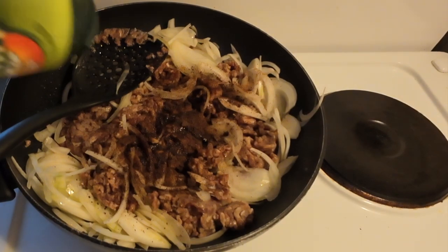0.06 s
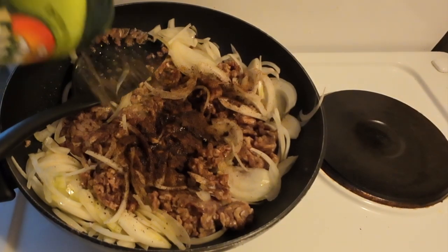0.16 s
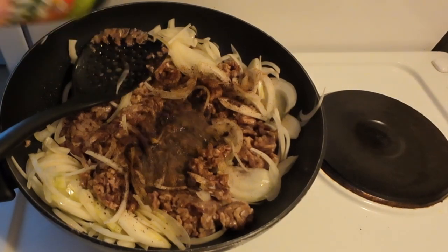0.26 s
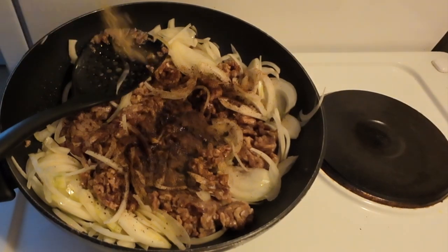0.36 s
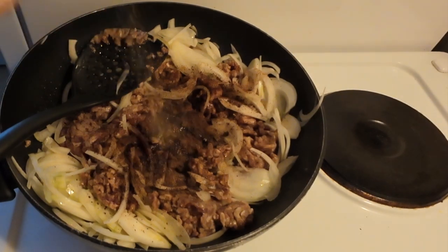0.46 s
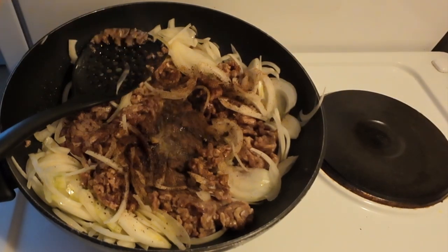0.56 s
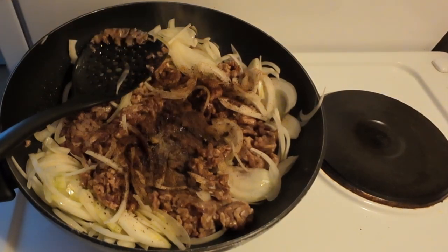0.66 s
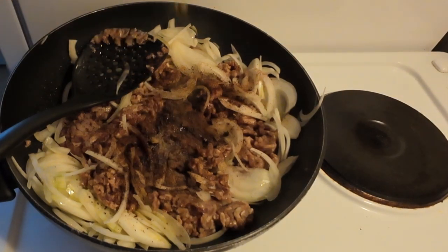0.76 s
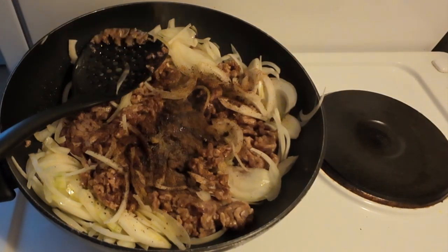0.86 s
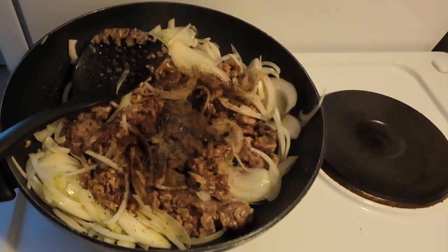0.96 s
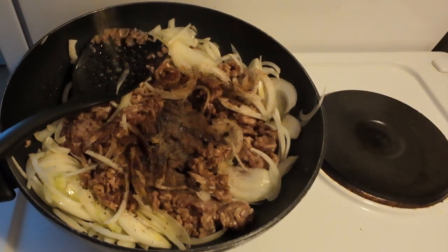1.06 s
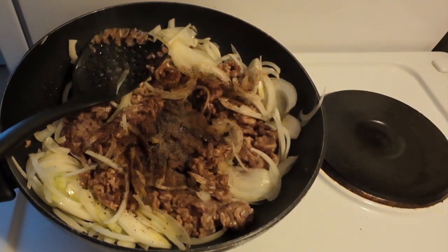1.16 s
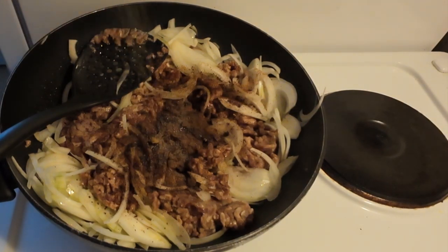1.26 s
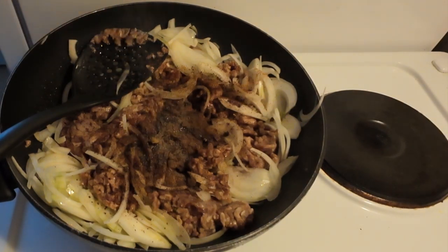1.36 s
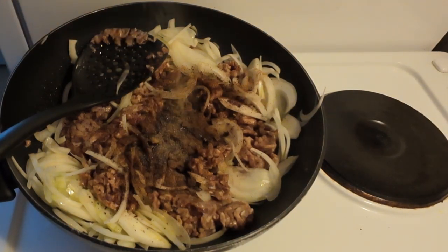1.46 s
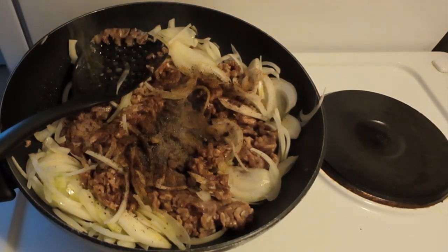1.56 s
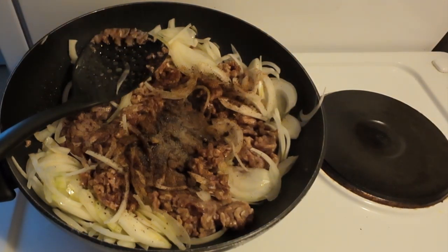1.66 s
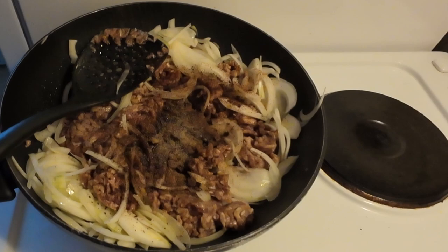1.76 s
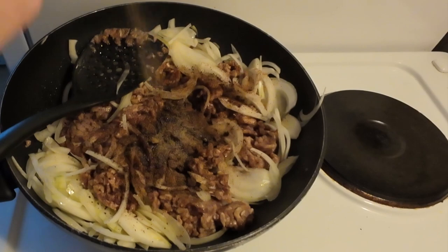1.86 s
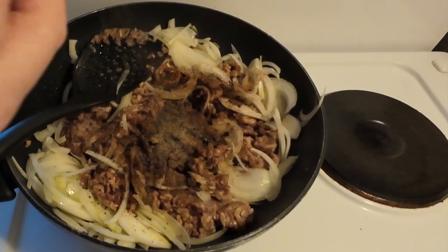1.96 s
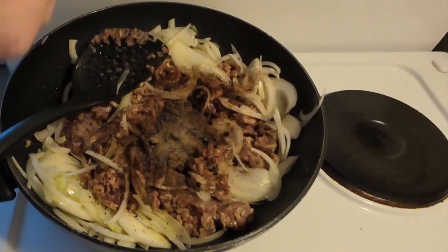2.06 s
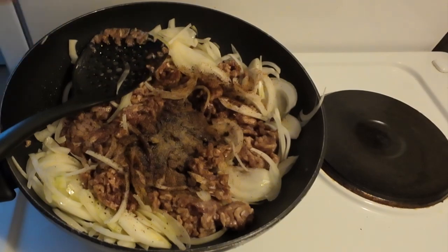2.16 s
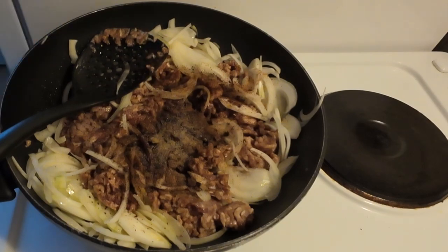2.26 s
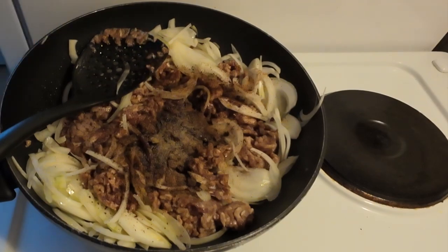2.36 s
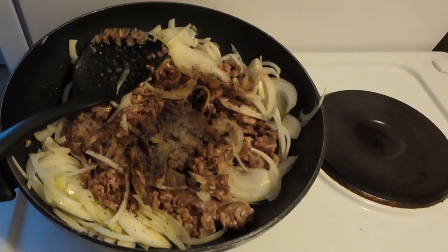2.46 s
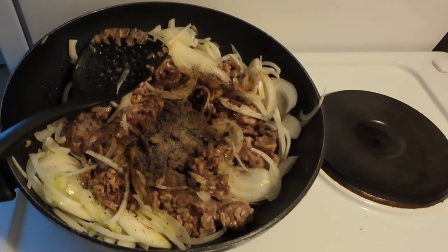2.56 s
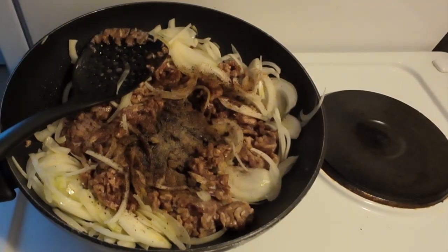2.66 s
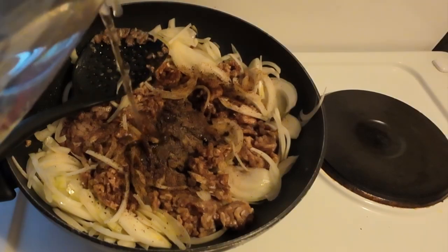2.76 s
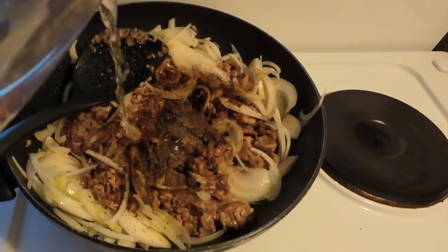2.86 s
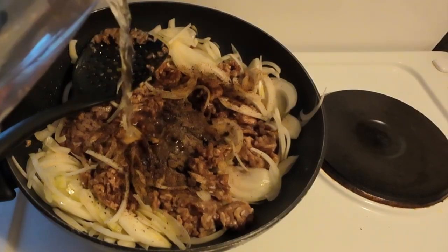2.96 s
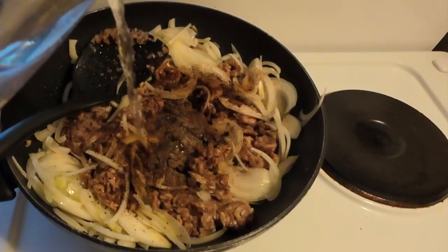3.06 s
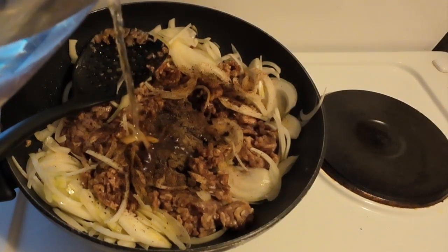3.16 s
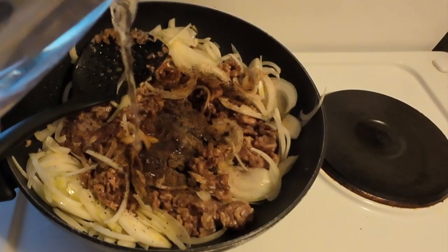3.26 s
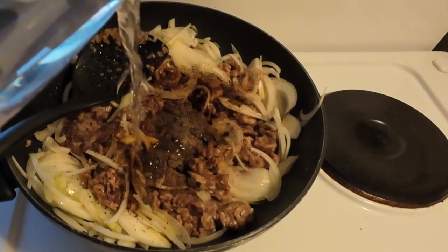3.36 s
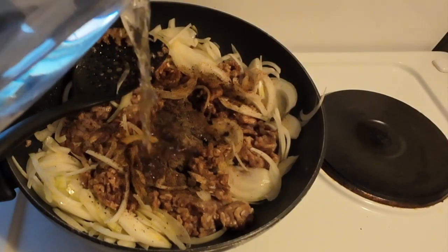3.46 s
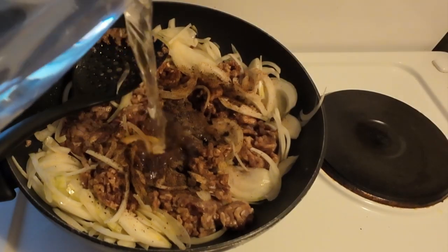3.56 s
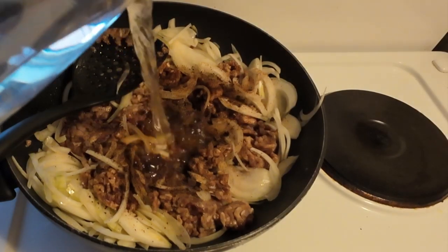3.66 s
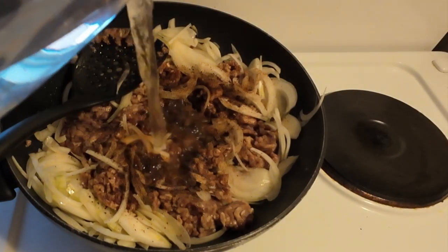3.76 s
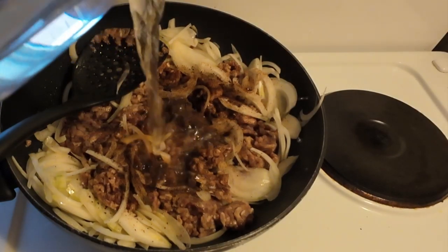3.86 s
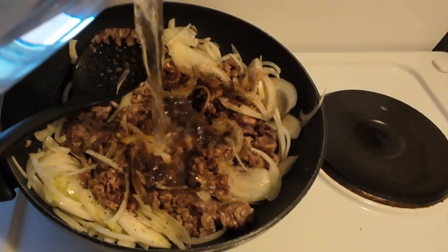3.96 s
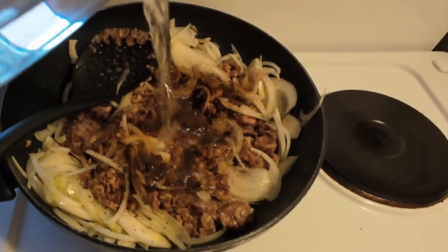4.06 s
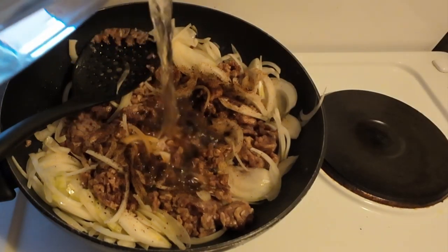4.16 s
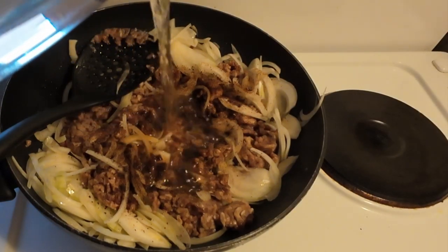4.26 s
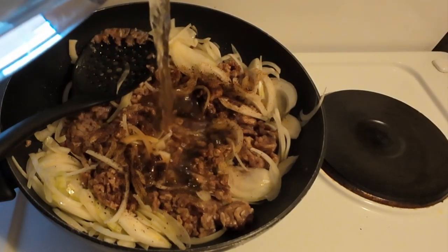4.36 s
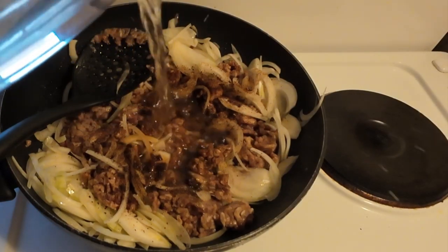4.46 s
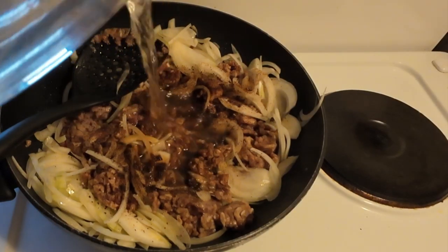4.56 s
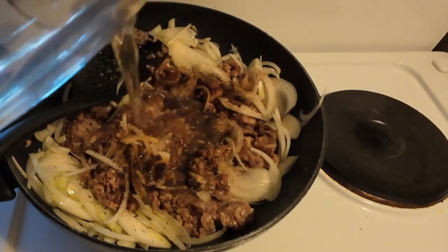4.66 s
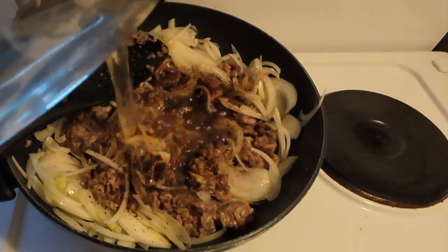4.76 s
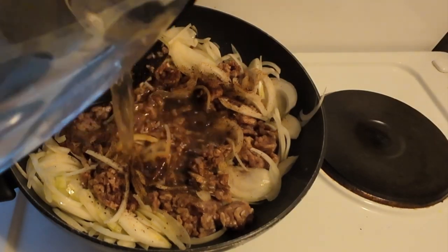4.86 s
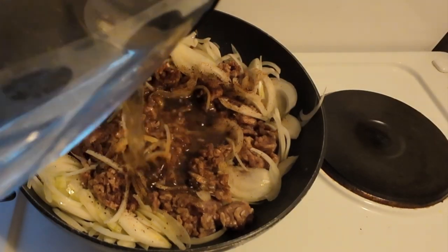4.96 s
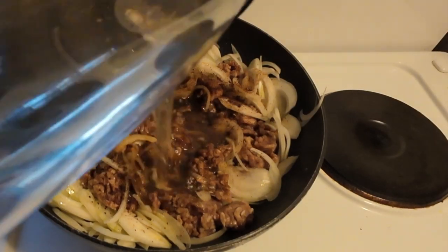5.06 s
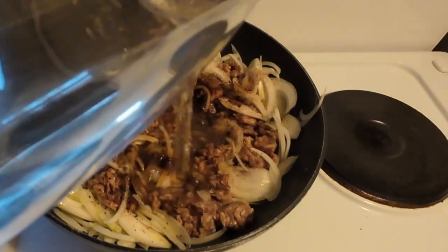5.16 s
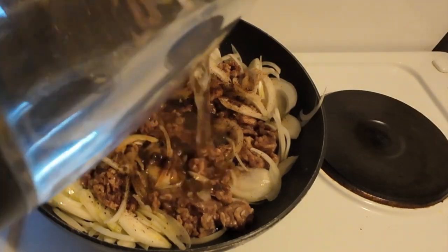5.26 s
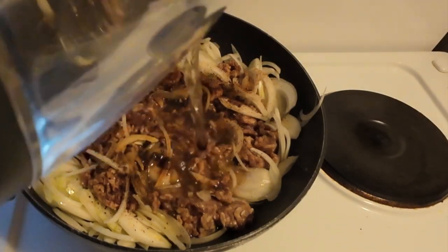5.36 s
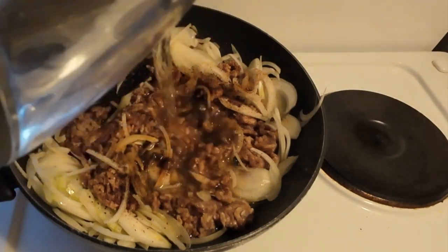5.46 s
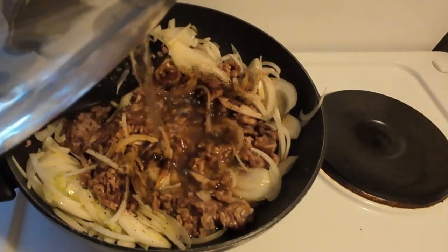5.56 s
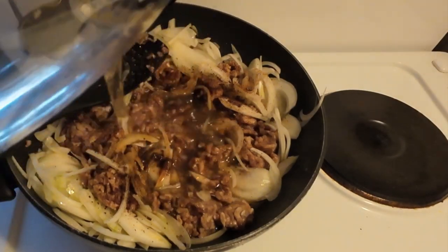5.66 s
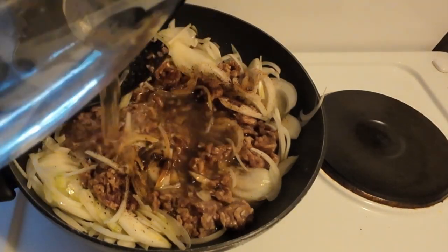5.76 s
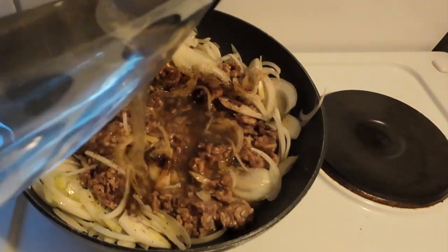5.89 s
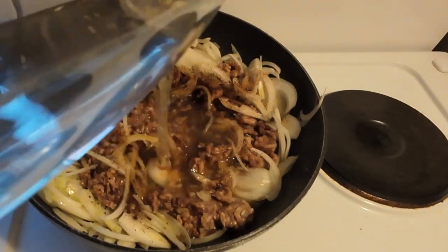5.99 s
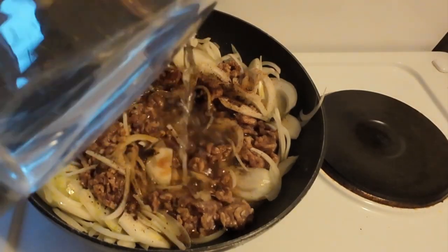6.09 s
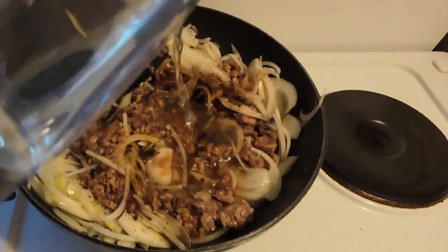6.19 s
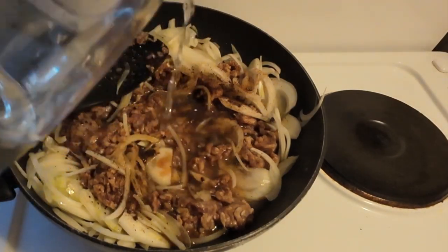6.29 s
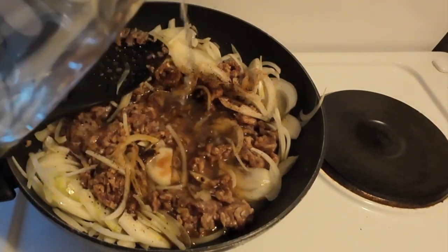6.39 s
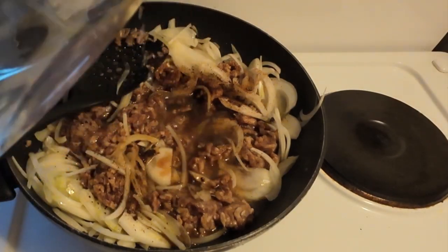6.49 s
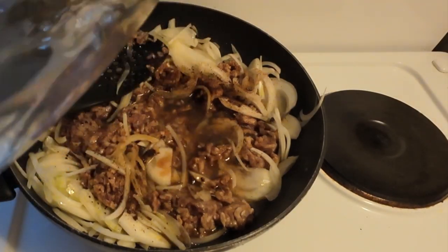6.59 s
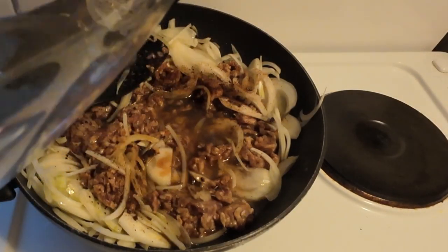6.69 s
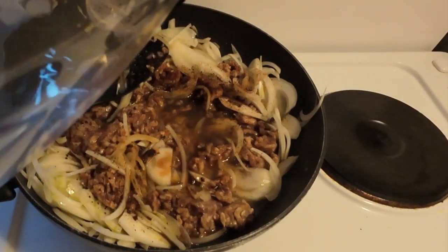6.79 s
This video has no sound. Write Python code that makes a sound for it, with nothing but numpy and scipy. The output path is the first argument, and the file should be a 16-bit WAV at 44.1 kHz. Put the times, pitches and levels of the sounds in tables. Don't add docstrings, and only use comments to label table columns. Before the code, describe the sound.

Minced meat and onions fry quietly close by, a fine steady sizzle with occasional bright spits and thin steam. Water sloshes faintly in a jug, then pours onto the food, much louder, with crisp splashes, bubbles and spray. The sizzle drowns, and the pour ends in a few tiny drips. Small kitchen, close stereo microphone with low air rumble.

```python
import sys
import numpy as np
from scipy import signal
from scipy.fft import rfft, irfft, next_fast_len
from scipy.io import wavfile

SR = 44100
rng = np.random.default_rng(int(sys.argv[2]) if len(sys.argv) > 2 else 0)


def generate_wav(sig):
    pcm = np.round(np.clip(np.atleast_2d(sig).T, -1, 1) * 32767).astype(np.int16)
    wavfile.write(sys.argv[1], SR, pcm)


def to_linear_factor(level_db):
    exponent = np.asarray(level_db, float) / 20
    return 10 ** exponent


N = 301203


def noise(*rows):
    return rng.standard_normal((*rows, N))


def seconds():
    return np.arange(N) / SR


def rms_one(x):
    return x / np.sqrt(np.mean(x ** 2) + 1e-20)


def in_time(rows):
    s, *columns = np.transpose(rows)
    return [np.interp(seconds(), s, column) for column in columns]


def at_hz(points, hz):
    hzs, values = np.transpose(points)
    return np.interp(np.log(hz + 1), np.log(hzs + 1), values)


def colour(x, points):
    size = next_fast_len(N)
    hz = np.arange(size // 2 + 1) * SR / size
    return irfft(rfft(x, size) * to_linear_factor(at_hz(points, hz)), size)[..., :N]


def drift(rate):
    r = np.exp(-40 * np.pi * rate / SR)
    slow = signal.lfilter([1], [1, -2 * r, r * r], rng.standard_normal(N // 20 + 2002))[2000:]
    return np.interp(np.arange(N) / 20, np.arange(len(slow)), rms_one(slow))


def swells(rows):
    t = seconds()
    return sum(to_linear_factor(row[1]) * np.exp(-((t - row[0]) / row[2]) ** 2) for row in rows)


def resonate(x, hz, width_hz):
    r = np.exp(-np.pi * width_hz / SR)
    top = np.array([1, 0, -1]) * (1 - r * r) / 2
    return signal.lfilter(top, [1, -2 * r * np.cos(2 * np.pi * hz / SR), r * r], x + 1e-18)


def modes(x, table):
    out = 0
    for k, (hz, width, db) in enumerate(table):
        ring = resonate(resonate(x, hz, width), hz, 2.2 * width)
        out = out + (-1) ** k * to_linear_factor(db) * ring
    return out


def grains(per_s, spread_db, clump_db, clump_rate):
    born = rng.random(N) < per_s * to_linear_factor(clump_db * drift(clump_rate)) / SR
    size_db = spread_db * np.minimum(rng.exponential(1, N), 4)
    return born * to_linear_factor(size_db) * rng.choice([-1, 1], N)


# frequency in Hz, level in dB per Hz.
ROOM = [(150, -3), (300, 9), (700, 2.5), (1500, -10), (4000, -24), (9000, -22), (16000, -35)]


def room_floor():
    return to_linear_factor(-76.5) * rms_one(colour(noise(), ROOM))


# frequency in Hz, level in dB per Hz.
AIR = [(15, -0.5), (35, -3), (70, -10.5), (105, -1.5), (140, -34.5), (220, -29), (400, -30.5), (4000, -110)]
# middle in seconds, level in dB, half length in seconds, pitch in Hz.
GUSTS = [(2.75, -49, 0.064, 80), (3.1, -38, 0.036, 60), (3.23, -41, 0.044, 61.5),
         (3.44, -37.5, 0.089, 82.26), (3.76, -39.5, 0.12, 69.56), (4.0, -36.5, 0.08, 65.1),
         (4.3, -40.5, 0.15, 80.7), (4.58, -38, 0.097, 71.2), (4.9, -53, 0.11, 89.8), (5.3, -45, 0.26, 88.6),
         (6.1, -32, 0.11, 80.3), (6.45, -43, 0.17, 53.46)]
# middle in seconds, level in dB, half length in seconds.
FLUTTERS = [
    (.6, -54.5, 0.11),
    (1.15, -61, .12),
    (1.7, -55, 0.066),
    (2.1, -62, .1),
    (2.7, -54, 0.066),
    (2.95, -52, 0.089),
    (4.84, -52.5, 0.065),
    (5.4, -46, 0.087),
]


def rumble():
    hum = to_linear_factor(-51.5 - 3.0) * rms_one(colour(noise(), AIR))
    flutter_level = to_linear_factor(-61 + 2.2 * drift(4.6)) + swells(FLUTTERS)
    flutter = flutter_level * rms_one(modes(noise(), [(105.4, 17.4, 0)]))
    turn = 2 * np.pi * np.cumsum(in_time(GUSTS)[2]) / SR
    swell = drift(4.5) * np.cos(turn) + drift(5.6) * np.sin(turn)
    gust_spectrum = [(15, -3), (35, -5), (60, 4.0), (95, 4), (160, -45), (500, -69), (4000, -120)]
    gust = rms_one(colour(noise(2), gust_spectrum))
    gust_level = to_linear_factor(-60) + swells(GUSTS)
    left = gust_level * to_linear_factor(3.5) * rms_one(swell + 0.52 * gust[0])
    right = gust_level * to_linear_factor(-6.5) * gust[1]
    return hum + flutter + left * np.array([[1], [-.25]]) + right * np.array([[0], [1]])


# middle in seconds, level in dB, half length in seconds.
SLOSH = [(.1, -57, 0.08), (1.17, -62, 0.11), (1.4, -58, 0.11), (1.6, -54, 0.098), (2.1, -56.5, 0.098),
         (2.4, -63, 0.16), (2.75, -50.5, 0.036), (2.98, -53.5, 0.17), (4.05, -61.5, 0.08),
         (4.29, -58.5, 0.12), (4.55, -53.5, 0.073), (5.88, -63.5, 0.39), (6.32, -53, 0.055)]
# frequency in Hz, width in Hz, level in dB.
JUG = [(323, 47, -5.5), (377.6, 16.7, -3), (430.2, 25.4, 3), (700, 180, -16.5)]
# time in seconds, peak in dB, time to fall 60
# dB in seconds.
THUDS = [
    (.005, -55.5, 0.2),
    (2.716, -41.5, 0.33),
    (4.529, -36.5, 0.081),
    (4.855, -53.5, 0.21),
    (5.42, -53.5, 0.15),
    (5.688, -47, 0.061),
    (6.289, -51, 0.1),
    (6.423, -34, 0.035),
]


def jug_and_pan():
    slosh_level = swells(SLOSH) * to_linear_factor(-5.5 + 3.1 * drift(18))
    slosh = slosh_level * rms_one(modes(noise(), JUG))
    t, thud_level = seconds(), np.zeros(N)
    for s, db, t60 in THUDS:
        rise = np.clip((t - s) / 0.012, 0, 1)
        thud_level += rise * to_linear_factor(db - 60 * np.abs(t - s) / t60)
    pan_tones = [(223, 146, -10), (443, 86, -1.0), (700, 87, 1.5), (880, 44, 4.5), (1280, 720, -1.0)]
    return slosh + thud_level * rms_one(modes(noise(), pan_tones))


# frequency in Hz, level in dB per Hz.
SIZZLE = [(150, -24), (250, -31), (560, -20), (760, -18), (850, -9), (1300, -5.5), (1450, 4), (2100, 2.5),
          (3300, 0), (4600, -6), (5900, -4.5), (7000, -12), (10000, -17.5), (16000, -16.5)]
# frequency in Hz, level in dB per Hz.
SPRAY = [(1000, 2), (3000, 18), (7000, 15), (9000, 15), (12000, 18.5), (16000, 10)]
# middle in seconds, level in dB, half length in seconds.
SPITS = [(0.085, -58, 0.015), (0.11, -56, 0.048), (0.318, -57, 0.018), (0.506, -47.5, 0.013),
         (0.53, -60.5, 0.084), (0.685, -54, 0.015), (1.0, -65, .03), (1.27, -63, 0.033), (1.33, -56, 0.041),
         (1.754, -56, 0.022), (2.04, -54.5, 0.036)]
# frequency in Hz, width in Hz, level in dB.
WHISTLE = [(1780, 184, -1), (3650, 330, -12.5)]
# middle in seconds, level in dB, half length in seconds.
STEAM_JET = [
    (2.3, -51.5, 0.16),
]


def frying():
    t = seconds()
    bursts = rms_one(grains(9000, spread_db=2.0, clump_db=2.0, clump_rate=21.0)) + 0.8 * noise()
    spray = rms_one(grains(6000, spread_db=3.5, clump_db=2.5, clump_rate=80.0)) + 0.8 * noise()
    drowned_s = np.maximum(t - 4.13, 0)
    sizzle = to_linear_factor(-52.5 - 11 * drowned_s) * rms_one(colour(bursts, SIZZLE))
    spits = swells(SPITS) * rms_one(colour(spray, SPRAY))
    steam_level = to_linear_factor(-60.5 - 2.5 * t) + swells(STEAM_JET)
    steam = steam_level * rms_one(modes(noise(), WHISTLE))
    whine_hz = 1776
    whine = rms_one(resonate(noise(), whine_hz, 5)) + 2 * np.sin(2 * np.pi * whine_hz * t)
    return sizzle + spits + steam + to_linear_factor(-84) * rms_one(whine)


POUR_STARTS_S = 2.72
# time in seconds, level of the splashing in dB.
POUR = [(2.7, -52), (3.12, -48), (3.26, -45.5), (3.7, -44), (3.86, -47.5), (4.0, -42), (4.59, -42.5),
        (4.98, -47), (5.22, -50.5), (5.46, -42.5), (5.61, -45), (5.79, -47.5), (6.05, -46.5), (6.21, -46.5),
        (6.33, -52), (6.45, -55), (6.54, -61.5), (6.62, -77), (6.83, -77)]
# frequency in Hz, level in dB per Hz.
WATER = [(500, -75), (800, -21), (1500, -5), (3500, 3.5), (6300, 1.5), (9000, 12), (15000, 11)]
# middle in seconds, level in dB, half length in seconds.
FIRST_HIT = [
    (2.75, -52.5, 0.046),
]


def pouring(turns=4.1):
    t, flow_db = seconds(), in_time(POUR)[0]
    pool_db = -3 * np.maximum(t - 1.54, 0)
    spray_db = -1 - 46.5 + 0.84 * (flow_db + 47.5)
    levels_db = [flow_db - 2.5 + pool_db, flow_db, spray_db]
    clicks = grains(2000, spread_db=3.5, clump_db=6.5, clump_rate=30.0)
    dealt = rng.integers(0, 22, N)
    hiss, layers, lulls = noise(2), np.zeros((3, N)), drift(17)
    for k, hz in enumerate(np.geomspace(850, 15000, 22)):
        source = rms_one(clicks * (dealt == k)) + 1.41 * hiss[k % 2]
        band = rms_one(modes(source, [(hz, hz / turns, 0)]))
        patches_db = 3.2 * drift(14.5) + 2.2 * lulls
        layer = int(hz > 2200) + int(hz > 7000)
        layers[layer] += (-1) ** k * band * np.sqrt(hz) * to_linear_factor(at_hz(WATER, hz) + patches_db)
    started = np.clip((t - POUR_STARTS_S) / 1, 0, 1) ** 0.043
    hit = swells(FIRST_HIT)
    return sum((started * to_linear_factor(db - 1.5) + hit) * rms_one(layer) for db, layer in zip(levels_db, layers))


def scatter(low_hz, high_hz, over_db, spread_db, count):
    flow_db, = in_time(POUR)
    chance = np.cumsum(to_linear_factor(flow_db) * (np.arange(N) > POUR_STARTS_S * SR))
    when, size, pitch = rng.random((count, 3)).T
    at = np.searchsorted(chance, when * chance[-1]).clip(0, N - 1)
    peak_db = flow_db[at] + over_db - spread_db * size
    return list(zip(at / SR, peak_db, low_hz * (high_hz / low_hz) ** pitch))


def splashes(table, turns, t60, spatter, late_s, snap=0):
    out, t = np.zeros(N + 2500), np.arange(2400) / SR
    fade_out = np.cos(t / t[-1] * np.pi / 2)
    hisses = rng.standard_normal((len(table), 2, 2400))
    for (s, db, hz), (wet, dust) in zip(table, hisses):
        bubble = 1.45 * np.sin(2 * np.pi * hz * t * (1 + .008 * hz * t)) * to_linear_factor(-60 * t * hz / 22)
        bubble *= np.minimum(t * hz, 1)
        bubble[0] += snap
        drops = rms_one(modes(wet * dust ** 2, [(hz, hz / turns, 0)])) * to_linear_factor(-60 * t / t60) * fade_out
        no_lows = signal.butter(3, .65 * hz, "high", fs=SR, output="sos")
        at = round((s + late_s) * SR)
        out[at:at + 2400] += to_linear_factor(db) * signal.sosfilt(no_lows, bubble + spatter * drops)
    return out[:N]


# time in seconds, peak in dB, pitch in Hz.
GURGLES = [(.07, -57, 700), (2.73, -43.5, 324), (4.533, -33, 1030), (4.55, -51, 960), (5.42, -56, 845),
           (5.59, -38.5, 1690), (5.62, -38.5, 2500), (6.075, -51, 1270), (5.86, -48, 1500),
           (5.88, -46, 1410), (5.9, -47, 1500), (6.262, -48, 1120), (6.3, -58, 790), (6.426, -47, 994)]


def gurgles():
    return splashes(GURGLES, turns=12, t60=.12, spatter=.5, late_s=0)


# time in seconds, peak in dB, pitch in Hz.
GLUGS = [(2.7288, -38, 1260), (3.2036, -35, 1520), (3.3319, -32.5, 2330), (3.3636, -33, 1700),
         (3.4087, -27, 1670), (3.4616, -31.5, 1720), (3.488, -46, 1630), (3.509, -31, 1520),
         (3.596, -39, 1560), (3.611, -27.5, 1900), (3.6963, -35, 2220), (3.9131, -35, 1620),
         (3.963, -20.5, 2440), (4.2848, -35, 2260), (4.3382, -46, 2260), (4.378, -37, 2410),
         (4.377, -30, 2210), (4.4193, -26.5, 2230), (4.4831, -33.5, 1650), (4.5128, -37, 2210),
         (4.5315, -24, 1280), (4.5794, -30.5, 1986), (4.7527, -32, 2300), (4.8104, -33.5, 2150),
         (4.856, -27, 1957), (5.0194, -38, 1715), (5.2405, -38, 2420), (5.2675, -35, 1870),
         (5.404, -42, 1690), (5.4078, -36, 1720), (5.4416, -40, 1060), (5.505, -44, 1410),
         (5.538, -37, 1650), (5.5502, -33, 1480), (5.5895, -47, 1720), (5.6118, -32.5, 1590),
         (5.6821, -37, 1150), (5.7076, -24.5, 1730), (5.939, -32.5, 2060), (6.0226, -35, 2107),
         (6.067, -31, 2380), (6.2402, -38, 2400), (6.258, -34.5, 2070), (6.4263, -38, 2060),
         (6.4734, -45, 1280)]


def glugs():
    table = GLUGS + scatter(1900, 3700, over_db=1.0, spread_db=15.0, count=8)
    return to_linear_factor(-3.0) * splashes(table, turns=3.1, t60=0.13, spatter=0.23, late_s=0.00052, snap=2.3)


# time in seconds, peak in dB.
CRACKS = [(3.0487, -25), (3.1018, -26), (3.2044, -15), (3.2603, -16), (3.2779, -19), (3.3012, -17.5),
          (3.3324, -31), (3.394, -34), (3.6097, -18), (3.727, -27), (4.0017, -18), (4.0662, -15),
          (4.0744, -24), (4.0894, -23), (4.3395, -10), (4.4854, -16.5), (5.5662, -14.5), (5.6094, -31),
          (5.9264, -28), (6.234, -16), (6.6462, -38)]


def film_cracks():
    table = [(s, db, 4950) for s, db in CRACKS]
    return to_linear_factor(-18) * splashes(table, turns=1.0, t60=0.012, spatter=0.78, late_s=.0004, snap=6.7)


# time in seconds, peak in dB, pitch in Hz.
DROPS = [(2.7353, -25, 8490), (2.7352, -20, 7760), (2.7647, -30, 7980), (2.789, -23.5, 7700),
         (2.876, -42, 7530), (2.8935, -18, 6550), (3.0182, -23, 7550), (3.0481, -32, 10300),
         (3.102, -34, 12000), (3.104, -25, 7800), (3.1326, -19.5, 10200), (3.2461, -37, 8400),
         (3.2591, -37, 10600), (3.3005, -39, 10100), (3.4192, -23.5, 9800), (3.4764, -24, 8200),
         (3.594, -18, 8340), (3.761, -25, 7000), (3.9296, -33, 10500), (3.9298, -14, 8950),
         (4.0009, -26, 9690), (4.1246, -32, 8720), (4.1321, -20.5, 10200), (4.1905, -36, 7910),
         (4.2329, -23, 9380), (4.425, -29, 8070), (4.4852, -12.5, 10300), (4.539, -18.5, 7710),
         (4.5836, -30, 6560), (4.8081, -39, 10200), (4.9773, -29, 10400), (5.071, -28, 8650),
         (5.2114, -25.5, 8150), (5.233, -25, 7910), (5.2583, -20, 7920), (5.27, -23, 6840),
         (5.289, -14, 6340), (5.3628, -42, 8120), (5.3829, -21, 6710), (5.5319, -32, 10450),
         (5.5457, -22, 7900), (5.6661, -24, 7900), (5.7496, -17, 8200), (5.7917, -21.5, 8820),
         (5.931, -24, 6700), (6.0417, -20.5, 7800), (6.0727, -25, 9940), (6.091, -22, 8700),
         (6.1204, -13.5, 7800), (6.144, -17, 10100), (6.1655, -20.5, 8350), (6.2189, -43, 8450),
         (6.2274, -36, 9000), (6.2397, -19, 7800), (6.3102, -21.5, 10600), (6.3317, -18, 8200),
         (6.3553, -15.5, 6500), (6.386, -28, 7000), (6.5347, -29.5, 8236), (6.6449, -28, 8900)]
# time in seconds, peak in dB, pitch in Hz.
TICKS = [(.081, -30.5, 10100), (.111, -40, 12000), (.44, -37.5, 11000), (5.895, -41, 9500),
         (5.91, -42, 9100), (5.95, -37, 10100), (5.98, -29, 11500), (6.367, -24, 13130), (6.402, -27, 8300),
         (6.418, -32, 14000), (6.442, -29, 11000), (6.46, -23, 13300), (6.487, -26, 13380),
         (6.557, -44, 11100), (6.578, -48, 8000), (6.615, -56, 13150), (6.67, -45, 13420),
         (6.703, -46, 9000), (6.75, -52, 12160), (6.765, -50.5, 13000), (6.815, -46, 13800)]
# time in seconds, peak in dB.
MIST = [(2.7328, -38), (2.7957, -22), (2.8939, -25), (2.9486, -25), (3.0147, -28), (3.0481, -22),
        (3.1, -17), (3.1319, -24), (3.2461, -38), (3.3026, -19), (3.3923, -41), (3.422, -21), (3.4766, -31),
        (3.567, -17), (3.5933, -24), (3.6093, -21), (3.728, -33), (3.7555, -14.5), (3.8507, -26),
        (3.8697, -29), (3.974, -20), (4.002, -21), (4.0475, -22), (4.107, -20), (4.1321, -23),
        (4.2327, -21), (4.2467, -16), (4.3035, -17), (4.414, -19.5), (4.4569, -18), (4.4853, -13),
        (4.5063, -28), (4.5402, -58), (4.5514, -15), (4.6539, -36), (4.808, -23), (4.9664, -24),
        (5.041, -33), (5.1149, -21), (5.2082, -34), (5.2506, -22), (5.2752, -18), (5.29, -16), (5.388, -22),
        (5.4024, -18), (5.5519, -22), (5.926, -22), (5.9505, -30), (6.034, -21), (6.1221, -35),
        (6.2274, -37), (6.2403, -15), (6.3117, -29), (6.3306, -22), (6.3555, -16), (6.401, -20),
        (6.4604, -25), (6.5342, -32), (6.645, -42), (6.6863, -34)]


def fine_drops():
    mist = [(s, db, 14000) for s, db in MIST]
    table = DROPS + TICKS + mist + scatter(4800, 15000, over_db=7, spread_db=8.0, count=30)
    return to_linear_factor(-3.5) * splashes(table, turns=3.3, t60=0.08, spatter=0.11, late_s=0.0006, snap=1.0)


# time in seconds, peak in dB, pitch in Hz.
SPLASH = [(2.8198, -25.5, 5100), (2.893, -24, 6650), (3.0167, -30, 5400), (3.0368, -29, 3640),
          (3.1022, -30, 2830), (3.1264, -35, 2880), (3.1414, -22, 4400), (3.1787, -23.5, 3860),
          (3.26, -36, 2380), (3.302, -27, 4300), (3.3497, -26, 5900), (3.3647, -24.5, 3440),
          (3.4568, -24, 3040), (3.5938, -29, 6500), (3.6025, -32, 3570), (3.6208, -23, 3440),
          (3.7702, -25, 2870), (3.9297, -22.5, 2900), (3.95, -26, 3240), (3.9643, -19, 3390),
          (4.0005, -21, 4450), (4.0356, -19.5, 5050), (4.066, -18, 4940), (4.1195, -25, 5200),
          (4.2842, -25.5, 2960), (4.311, -23, 2960), (4.3258, -13.5, 3650), (4.4099, -29, 5390),
          (4.4188, -26, 3940), (4.515, -34, 2920), (4.533, -29, 2660), (4.5915, -20.5, 5500),
          (4.6549, -28, 3400), (4.7522, -27.5, 2430), (5.0216, -31.5, 2750), (5.169, -35, 3320),
          (5.2338, -33, 5300), (5.2694, -17.5, 5510), (5.29, -16.5, 5730), (5.34, -28, 3530),
          (5.3974, -25, 3694), (5.5517, -25, 4300), (5.5674, -19, 3440), (5.6414, -35, 2800),
          (5.6773, -28, 4000), (5.68, -19, 4160), (5.8194, -27, 3430), (5.929, -30, 6400),
          (5.9969, -28, 6160), (6.0347, -26.5, 4000), (6.118, -25, 3520), (6.146, -23, 3530),
          (6.2196, -42, 2700), (6.2339, -11.5, 4350), (6.3097, -30, 4460), (6.3309, -19, 6320),
          (6.3569, -15.5, 6450), (6.386, -18.5, 5260), (6.7003, -39.5, 3600), (6.7487, -45, 4550),
          (3.0477, -30, 3470), (3.161, -24.5, 3920), (3.3202, -25, 5900), (3.4197, -25.5, 4200),
         (3.472, -25, 3660), (3.5013, -29, 3830), (3.978, -27, 3270), (4.339, -22, 4200),
         (4.4823, -26, 5840), (5.249, -22, 6200), (5.3824, -23.5, 4700), (5.59, -22.5, 4500),
         (5.703, -25.5, 2620), (6.1651, -25, 5356), (6.242, -19, 4000), (6.261, -29, 2970),
         (6.451, -33, 5330), (6.51, -35.5, 6300), (6.585, -49, 2870)]


def middle_splashes():
    table = SPLASH + scatter(2200, 5300, over_db=8, spread_db=2.0, count=30)
    return to_linear_factor(-4.0) * splashes(table, turns=3.6, t60=0.092, spatter=0.23, late_s=.0005, snap=1.0)


# frequency in Hz, width in Hz, level in dB.
PAN = [(700, 8.9, -4), (840, 23, 7.5), (934, 27, 7.5), (1096, 82, -2.5), (1280, 13, 8), (1500, 22, 3.5),
       (2300, 34, -1), (2460, 52, 1), (2960, 180, -5), (3440, 37, 3), (3710, 30, -1), (4000, 39, -2),
       (5190, 19, 5.5), (5920, 44, -5)]
# frequency in Hz, side against middle in dB.
PORTS = [(200, -0.5), (380, -10), (700, -11), (1290, -32), (2380, -40), (4400, -13.5), (8120, -4.5),
         (15000, -2)]
# frequency in Hz, level in dB.
MICROPHONE = [(6300, 2.5), (7200, 0), (8000, 4.5), (10400, 2.5), (10900, 0), (12200, -1.5), (13300, 9),
              (14200, 2.5), (15000, -2), (15750, -4.5), (16000, -55)]
# frequency in Hz, left against right in dB.
TILT = [(380, -1), (700, -2), (1290, 0.0), (2380, 1), (4400, -0.5), (8120, -2), (15000, -9)]


def ports(mid):
    t = np.arange(8820) / SR
    echo = rms_one(rng.standard_normal(8820) * to_linear_factor(-60 * t / .25)) / np.sqrt(8820)
    mid = mid + to_linear_factor(-16) * signal.fftconvolve(mid, echo)[:N]
    mid = mid + 0.69 * sum(to_linear_factor(db) * resonate(mid, hz, width) for hz, width, db in PAN)
    side = colour(mid * (0.41 + drift(124.0)), PORTS)
    heard = colour(mid + to_linear_factor(-0.5) * side * np.array([[1], [-1]]), MICROPHONE)
    left = colour(heard[0], [(hz, db / 2) for hz, db in TILT])
    right = colour(heard[1], [(hz, -db / 2) for hz, db in TILT])
    return np.array([left, right])


def scene():
    water = pouring() + gurgles() + glugs() + film_cracks() + fine_drops() + middle_splashes()
    return ports(room_floor() + jug_and_pan() + frying() + water) + rumble()


def band_limit(x):
    return signal.sosfilt(signal.butter(12, 16480, fs=SR, output="sos"), x)


def record(dry):
    return band_limit(dry)


dry = scene()
out = record(dry)
generate_wav(out)
```